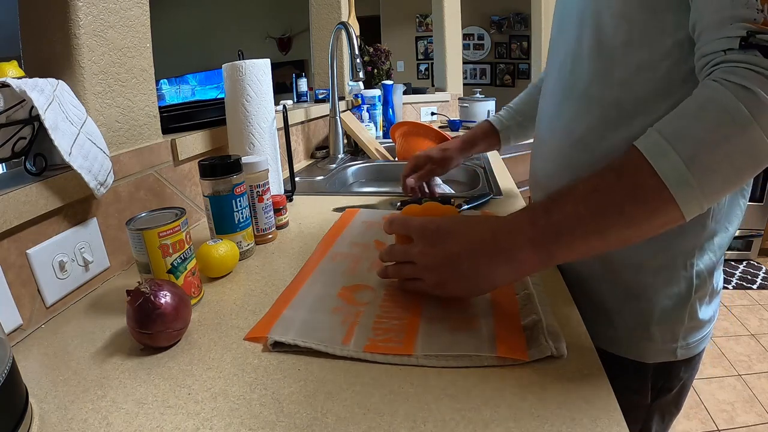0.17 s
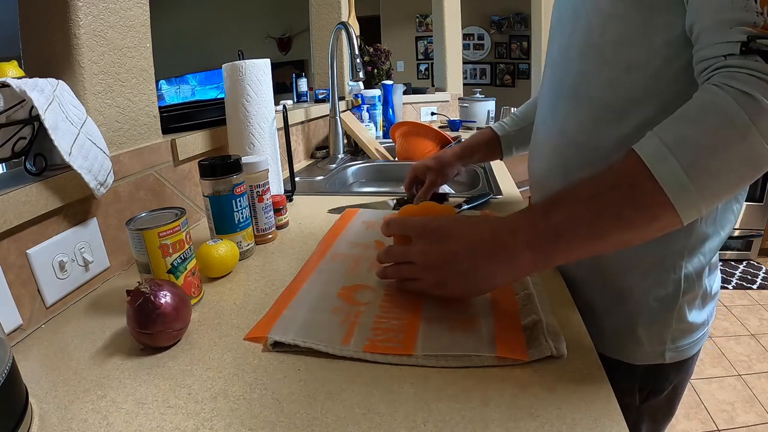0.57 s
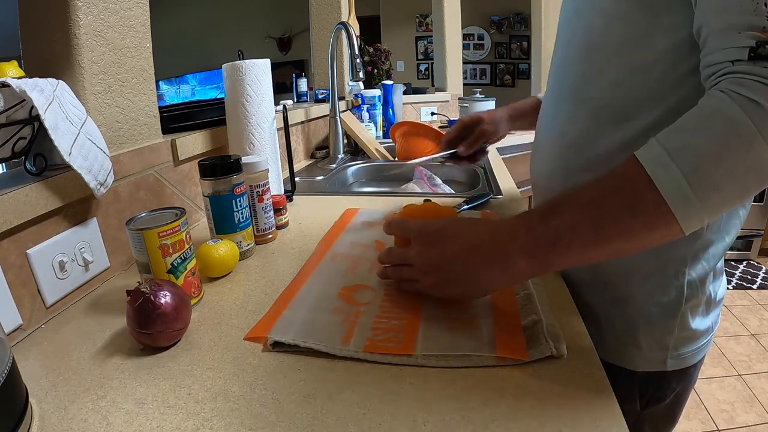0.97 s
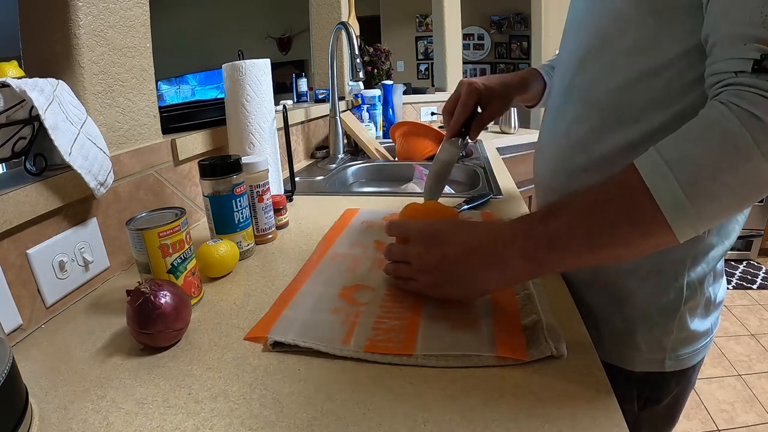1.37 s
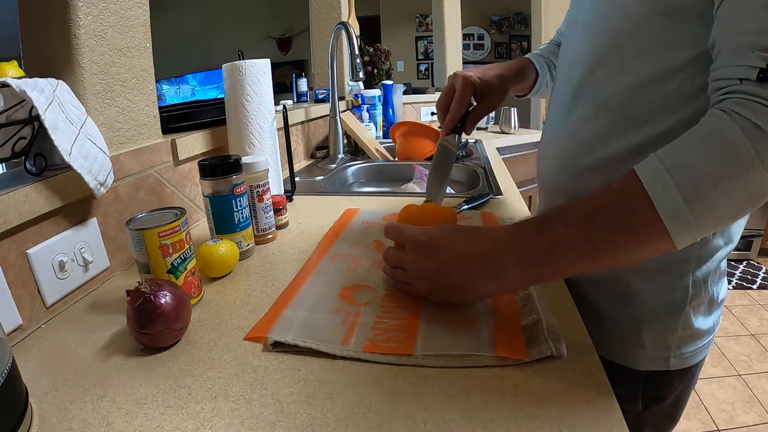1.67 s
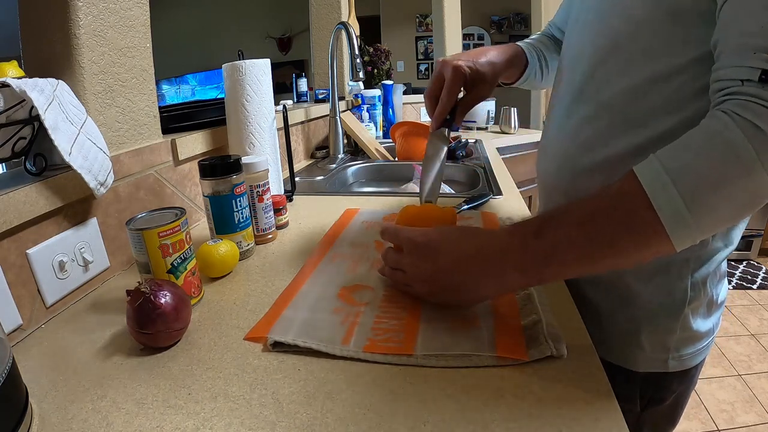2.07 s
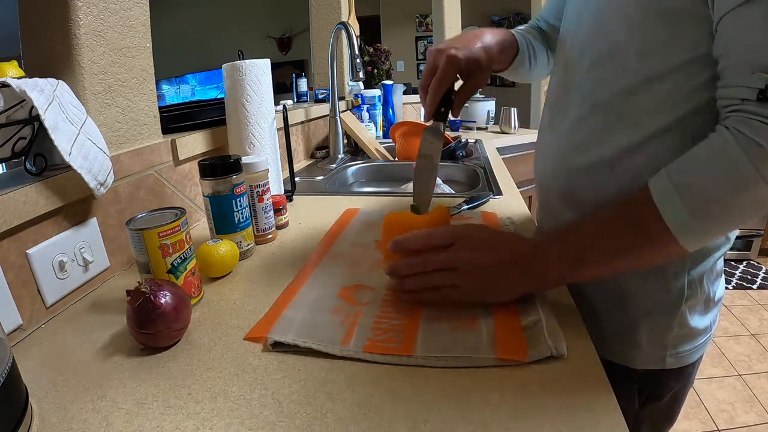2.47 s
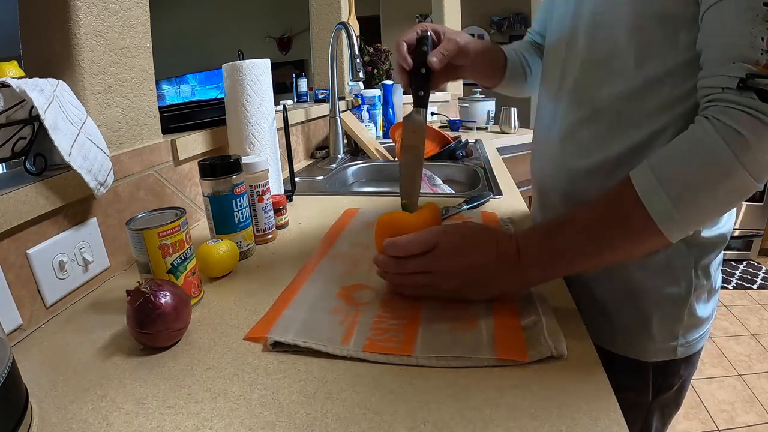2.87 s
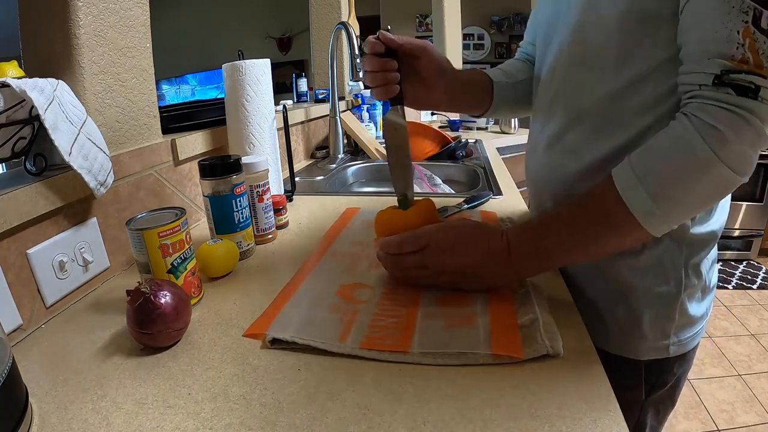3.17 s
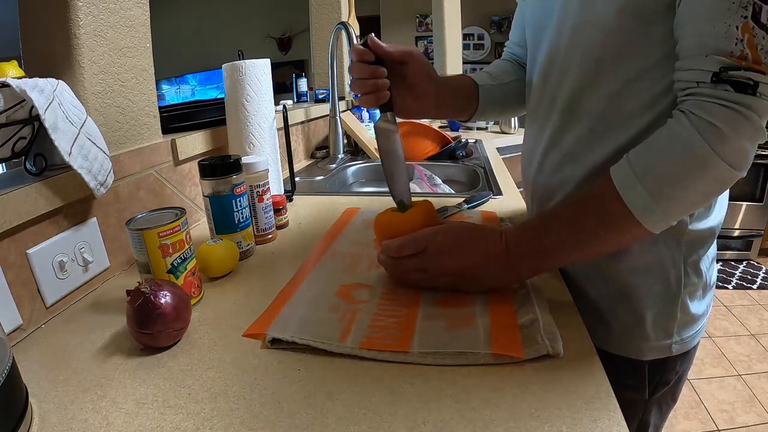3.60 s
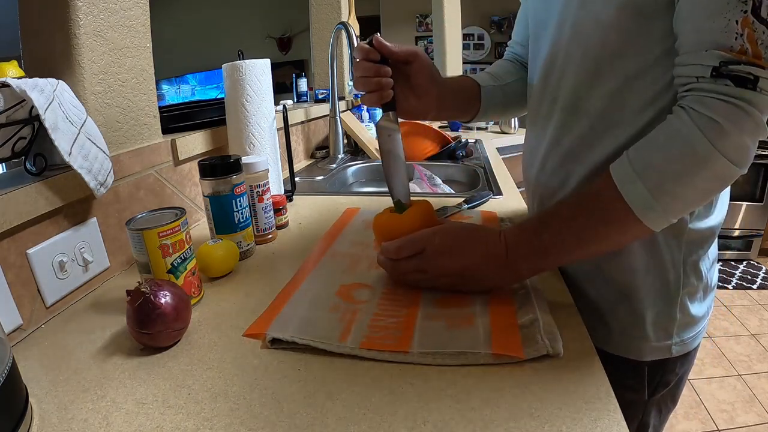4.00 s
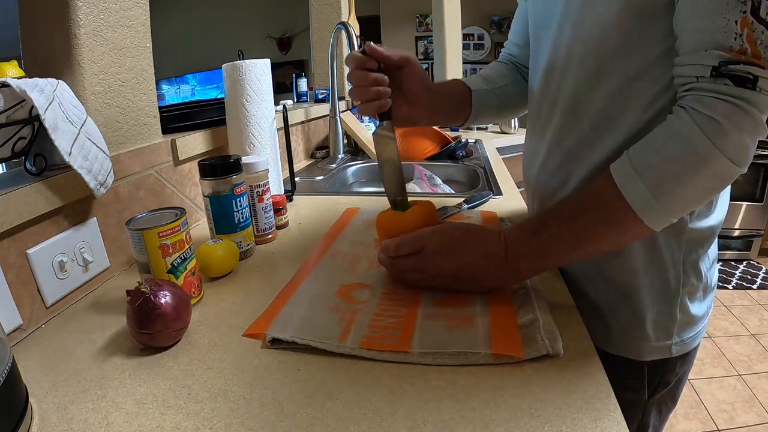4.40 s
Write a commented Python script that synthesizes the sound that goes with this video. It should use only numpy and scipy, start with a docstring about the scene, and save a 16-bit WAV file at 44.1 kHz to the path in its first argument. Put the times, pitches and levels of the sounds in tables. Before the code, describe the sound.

A low, steady motor hum and soft fan rush fill a small, hard-surfaced kitchen throughout, heard in stereo from close by on the counter. From 0 to about 0.45 s, steel utensils clatter against a sink rim: light clinks at first, then a loud tumble of hollow knocks, sharp clicks and short metallic ringing, strongest around 0.2 to 0.4 s, over a faint blade scrape. Sparser taps follow at 0.57 to 0.8 s, with short scrapes, a tiny groaning judder near 0.72 s and a final brighter knock and scrape at 0.8 s. Mostly hum remains until faint rubs around 1.7 to 2.3 s. From 2.3 to 3.2 s, a knife tip pushes into a crisp pepper in soft, juicy, grainy crunches, the skin giving way hollowly near 2.7 s. From 3.5 s come faint rubbing and small snaps, crisper at 4.2 to 4.5 s, with dull low counter bumps near 4.0 and 4.3 s.

```python
"""Appliances hum throughout in a small, hard kitchen: motor tones over filtered fan noise.
First a knife is picked out of steel utensils at a sink rim: decaying modes and noise bursts knock and clink.
Meanwhile the blade scrapes along the rim: grains excite its modes; it groans briefly before the loudest drags.
Then its tip is pushed and sawn through a crisp bell pepper: shaped grains crunch, rub and snap.
All is heard in stereo from close by on the counter."""
import sys
import numpy as np
from scipy import signal
from scipy.fft import rfft, irfft, next_fast_len
from scipy.io import wavfile
from scipy.ndimage import uniform_filter1d, map_coordinates

SR = 44100
rng = np.random.default_rng(int(sys.argv[2]) if len(sys.argv) > 2 else 0)


def bounce(signal):
    """Save signal as a 16-bit WAV file at the path given by the first command-line argument."""
    frames = np.transpose(np.atleast_2d(signal))
    limited = np.clip(frames, -1, 1)
    pcm = np.round(limited * 32767).astype(np.int16)
    wavfile.write(sys.argv[1], SR, pcm)


N = 200610

# Motor tones. Each row: frequency in Hz, mean level in dB rms.
MOTOR_TONES = [(36, -51), (59, -59.5), (109, -54.5), (119.9, -46), (144.9, -46.5), (289.8, -57.5),
               (349.5, -62.5), (579.8, -70.5), (1841, -76.5), (2068, -88.5)]
# Fan noise. Each row: frequency in Hz, relative density in dB per Hz.
FAN_SPECTRUM = [(20, -17), (45, -17.5), (80, -9.5), (130, 2), (170, -4), (250, -3.5), (370, -5), (450, -12),
                (650, -22), (1000, -19), (1850, -26), (2800, -36), (8500, -53.5), (12000, -76)]
FAN_DB, FAN_WANDER_DB = -47.5, 0.5
# Diffuse sound. Each row: frequency in Hz, left-right likeness from 0 to 1.
DIFFUSE_LIKENESS = [(100, 0.97), (700, 0.93), (1500, 0.75), (3000, 0.53), (6000, 0.21), (12000, 0.17)]
# Reverberation of the kitchen. Each row: frequency in Hz, t60 in seconds.
KITCHEN_T60 = [(150, 0.44), (700, 0.55), (3000, 0.5), (8000, 0.55), (14000, 0.23)]
# Port colour. Each row: frequency in Hz, left minus right in dB.
PORT_DIFFERENCE = [(500, 0), (1000, 0), (2000, 1.6), (4000, 0.9), (7000, -0.6), (9000, -1.2), (13000, -2.5)]
TOP_HZ = 15650

# Utensils meeting the rim and each other. Each row: start in seconds, relative knock level in dB,
# favoured knock pitch in Hz, relative click level in dB, favoured click pitch in Hz, relative ring level in dB.
UTENSIL_CONTACTS = [(0.013, -34.5, 1150, -46.5, 3300, -55), (0.108, -47, 300, -44, 2500, -67),
                    (.118, -33.5, 1200, -47, 3600, -42), (0.1386, -59, 705, -35, 8600, -58),
                    (0.157, -23, 450, -34.5, 2400, -72), (.166, -23, 400, -48, 2400, -72),
                    (.187, -31, 260, -49, 2000, -72), (.212, -17, 760, -42.5, 6500, -65),
                    (0.2276, -12, 697, -32.5, 2000, -64), (.2325, -14, 1220, -40.5, 2420, -58),
                    (.241, -14, 634, -59, 1800, -66), (0.248, -17.5, 458, -56, 1790, -70),
                    (.262, -25.5, 480, -57, 1800, -74), (0.305, -16, 544, -53, 2150, -70),
                    (.311, -10.5, 1140, -27, 3600, -49), (.321, -8.5, 627, -35, 4800, -44.5),
                    (0.3254, -16.5, 700, -26.5, 4800, -51), (.3305, -14.5, 715, -29.5, 6600, -33.5),
                    (.338, -23.5, 484, -49.5, 3700, -51), (.358, -19.5, 298, -31, 2300, -57),
                    (.382, -16, 221, -45, 2000, -46), (.392, -20, 960, -29, 3080, -61),
                    (0.396, -26, 1780, -44, 4900, -65), (.463, -34.5, 1120, -58.5, 2000, -65),
                    (0.5744, -26, 560, -44, 6500, -58), (.598, -41, 222, -58, 3530, -74),
                    (0.6638, -48.5, 300, -52.5, 5000, -65), (.716, -41, 600, -47, 3800, -72),
                    (.735, -41.5, 800, -57, 2200, -72), (.758, -52, 480, -46, 2000, -73),
                    (.789, -40, 1460, -49, 6200, -74), (.798, -29, 600, -53, 6000, -72),
                    (.8045, -25.5, 340, -42.5, 3200, -69)]
# Modes of sink and counter. Each row: frequency in Hz, relative level in dB, t60 in seconds.
SINK_MODES = [(189, -28.5, 0.16), (220, 0, 0.36), (263, -16, 0.15), (298.5, 4, 0.15), (390, -13, 0.24),
              (451.4, 0.5, 0.23), (472, -2.5, 0.11), (520, 2.5, 0.16), (553, -4.5, 0.13), (628.7, -2, 0.14),
              (680, -9, 0.16), (729, -4, 0.17), (735.7, -2.5, 0.19), (774, -10, 0.14), (901, -7.5, 0.19),
              (932, 0.5, 0.11), (1053, -11.5, 0.17), (1121.3, -2.5, 0.16), (1174, -12, 0.14),
              (1252, -4.5, 0.12), (1459, -5, 0.074), (1632, -3.5, 0.091), (1735, -4, 0.092),
              (1855, -14, .11), (1897, -9.5, 0.14)]
# Crowd of weaker sink modes. Each row: frequency in Hz, relative density in dB per Hz.
THUD_SPECTRUM = [(50, -10.5), (110, -1), (220, -27), (450, 5), (750, -6.5), (1150, -9), (1800, -12.5),
                 (2900, -48), (5000, -27), (9000, -79)]
# Steel pressed on steel, briefly damped. Each row: frequency in Hz, -6 dB width in Hz, relative level in dB.
CLICK_PEAKS = [(1350, 2060, 7), (2254, 650, 1.5), (3160, 590, -3.5), (4130, 180, -1), (4695, 450, -1),
               (6030, 360, -11), (6840, 440, -7.5), (8650, 310, -5.5), (9080, 430, -13), (10500, 550, -19),
               (12800, 1000, -24), (15140, 900, -25.5)]
# Modes of the utensils. Each row: frequency in Hz, relative level in dB, t60 in seconds when free.
CUTLERY_MODES = [(2030, -6, .35), (2180, -7, .3), (2620, -7, .28), (3270, -6, .08), (3400, -6, .08),
                 (3672, 3, .4), (4270, -4, .06), (4500, -5, .07), (4760, -4, .25), (4813, 2, .38),
                 (4960, -3, .16), (5690, -14, .15), (6002, -9, .3), (6266, -13, .1), (6934, -7, .16),
                 (7050, -8, .2), (8516, -1.5, .09), (8660, -6, .05), (9238, -17, .15), (10330, -17, .28),
                 (11000, -21, .22), (12900, -22, .16), (13400, -26, .16)]
# A contact lasts too long for the highest treble. Each row: frequency in Hz, gain in dB.
STEEL_GAIN = [(300, -6), (1200, 0.5), (9000, -2), (11000, -3.5), (15500, -10.5)]
# Sliding handles. Each row: frequency in Hz, relative density in dB per Hz.
SLIDE_SPECTRUM = [(60, -27), (130, -38), (185, 2.5), (225, -4), (300, 1.5), (380, -14), (480, -12.5),
                  (620, -7.5), (1000, -17), (2000, -35), (4000, -40), (9000, -99)]
KNOCK_FAVOUR_DB, KNOCK_OCTAVES = 8, 0.23  # lift and reach of the favoured pitches
CLICK_FAVOUR_DB, CLICK_OCTAVES = 11, 0.52
DENT_DB, DENT_T60_S = 5, 0.0089  # the struck spot itself gives briefly; dB relative to the knock
FREE_AT_S, PRESSED_T60_RATIO = 0.3, 0.35
SLIDE_DB, SLIDE_DB_PER_KNOCK_DB = -29, 0.35  # level for a knock of 0 dB
SLIDE_RISE_S, SLIDE_T60_S = 0.038, 0.17

# Blade drags over the rim. Each row: start in seconds, length in seconds, relative final level in dB,
# swell up to it in dB (negative falls), free ringing relative to that level in dB.
BLADE_DRAGS = [(0, 0.24, -52, 1.5, -14), (0.613, 0.036, -52.5, 0.5, 0), (0.708, 0.038, -55, -4, -10),
               (0.762, 0.027, -44.5, 4, -12), (0.782, 0.018, -36.5, 2, 4.5)]
DRAG_ATTACK_S, DRAG_T60_S = 0.002, 0.023
# Modes of the free blade. Each row: frequency in Hz, relative level in dB, t60 in seconds.
BLADE_MODES = [(793, 2, .07), (878, 5, 0.08), (1350, 4.5, 0.2), (1460, 8.5, 0.035), (1760, 1, 0.06),
               (1990, 0, 0.07), (2400, -9, .06), (3137, -6, 0.093), (3656, -12, 0.05), (4640, -17, .06),
               (5480, -17.5, 0.2), (5950, -12, 0.045), (6300, -20, .05), (6980, -15, 0.1),
               (8485, -11.5, 0.11), (10270, -25.5, 0.2), (12300, -29, .15), (13200, -34, .22),
               (14560, -37.5, .15), (15000, -33, .1)]
JUDDER_AT_S, JUDDER_HOLD_S, JUDDER_HZ, JUDDER_DB = 0.713, 0.043, 479.5, -43.5  # mean pitch, final level
# Harmonics of the judder from the first up: relative level in dB.
JUDDER_HARMONICS = [3, -11.5, -29, -9]

# Blade rubs in its slit. Each row: start in seconds, length in seconds, relative final level in dB, swell in dB.
SLIT_RUBS = [(1.66, .1, -81, 2), (2.06, 0.025, -69, -1), (2.21, 0.033, -76, -4), (2.302, 0.032, -64.5, 0),
             (2.83, 0.17, -77, 4), (3.225, 0.031, -70, 1), (3.48, .31, -79.5, -7),
             (4.222, 0.059, -51.5, 7.5), (4.29, 0.097, -70, 13), (4.447, 0.024, -59.5, 5),
             (4.48, 0.049, -67, -5)]
RUB_ATTACK_S, RUB_T60_S = 0.0063, 0.097
# Held blade, damped by the flesh. Each row: frequency in Hz, -6 dB width in Hz, relative level in dB.
HELD_BLADE_PEAKS = [(900, 460, -1), (1400, 700, -1.5), (2280, 750, -6.5), (3510, 690, 1), (4650, 580, 0.5),
                    (5270, 270, 3.5), (5880, 340, 4), (6700, 520, 0), (8360, 560, -1.5), (8870, 690, -1),
                    (10100, 610, -9.5), (12500, 1200, -17)]
# Surges of the edge into the flesh. Each row: start in seconds, length in seconds, relative final level in dB,
# swell in dB, favoured pitch in Hz.
CUT_SURGES = [(2.315, 0.023, -56, 4, 5030), (2.469, 0.081, -55.5, 1.5, 3300),
              (2.568, 0.091, -54.5, 6, 4560), (2.667, 0.074, -58.5, -2, 3000),
              (2.984, 0.095, -57, 10, 3300), (3.082, .08, -53, 3.5, 2700), (3.166, 0.021, -56.5, -2, 3500),
              (3.226, 0.032, -60.5, -1, 2720)]
CUT_ATTACK_S, CUT_T60_S = 0.015, 0.32
CUT_FAVOUR_DB, CUT_OCTAVES = 1.5, 0.23
CRISP_DB = 2.2  # depth of the patches in the bursting cells
# Bursting cells. Each row: frequency in Hz, relative density in dB per Hz.
FLESH_SPECTRUM = [(650, -47), (1200, 2), (1750, -1), (2800, -4), (4600, -6), (7000, -13), (9000, -13.5),
                  (11000, -21.5), (13000, -26), (15500, -34)]
# Fine juice spray under a hard push. Each row: frequency in Hz, relative density in dB per Hz.
FIZZ_SPECTRUM = [(3000, -26), (6000, -13), (9000, -0.5), (13000, -2), (15500, -4)]
FIZZ_DB = -64.5  # at the hardest push
# Hollow shell of the pepper. Each row: frequency in Hz, relative density in dB per Hz.
SHELL_SPECTRUM = [(500, -27), (750, -3.5), (930, 12.5), (1200, 8.5), (1500, 5), (1800, 8.5), (2100, -6),
                  (2450, 2.5), (2900, -3.5), (3500, -1), (6000, -30), (12000, -37)]
SKIN_AT_S, SKIN_DB = 2.673, -44
SKIN_ATTACK_S, SKIN_HOLD_S, SKIN_T60_S = 0.02, 0.025, 0.24
# Fibre snaps. Each row: start in seconds, relative peak in dB, favoured pitch in Hz.
FIBRE_SNAPS = [(3.494, -57, 3500), (3.709, -53, 3600), (3.741, -56, 2620), (3.783, -54, 3600),
               (3.9384, -61.5, 8600), (3.998, -49, 8900), (4.018, -58, 3700), (4.15, -57, 6300),
               (4.239, -41.5, 5600), (4.2721, -43, 3700), (4.466, -46.5, 6000)]
SNAP_FAVOUR_DB, SNAP_OCTAVES = 8, 0.3
# Pushes that rock the counter. Each row: start in seconds, length in seconds, final level in dB, swell in dB.
COUNTER_BUMPS = [(3.99, 0.05, -51, -4), (4.3, 0.07, -45.5, 3)]
BUMP_ATTACK_S, BUMP_T60_S = 0.025, 0.1
# Rocking counter. Each row: frequency in Hz, relative density in dB per Hz.
COUNTER_SPECTRUM = [(20, -20), (36, -13), (52, 15), (80, -6), (200, -8), (400, -22), (700, -32),
                    (1500, -55), (4000, -99)]


def amp(db):
    """Decibels to gain."""
    return 10 ** (np.asarray(db) / 20)


def unit(x):
    """Scaled to rms 1."""
    return x / np.sqrt(np.mean(x ** 2) + 1e-20)


def along(points, hz):
    """Interpolates (Hz, value) points on a log frequency axis."""
    f, v = np.transpose(points)
    return np.interp(np.log(hz + 1), np.log(f + 1), v)


def fade(t, t60_s):
    """Exponential decay by 60 dB in t60_s."""
    return np.exp(-np.log(1000) * t / t60_s)


def wobble(rate_hz):
    """A smooth random curve with rate_hz knots a second."""
    knots = rng.standard_normal(int(N * rate_hz / SR) + 4)
    return map_coordinates(knots, [np.arange(N) * rate_hz / SR])


def add(track, start_s, sound):
    """Adds a sound to a track in place."""
    part = track[max(round(start_s * SR), 0):][:len(sound)]
    part += sound[:len(part)]


def filtered(x, response):
    """x times a complex response of frequency."""
    n = x.shape[-1]
    m = next_fast_len(n + SR // 8)
    return irfft(rfft(x, m) * response(np.fft.rfftfreq(m, 1 / SR)), m)[..., :n]


def coloured(x, spectrum):
    """x shaped by (Hz, dB) points, at rms 1."""
    return unit(filtered(x, lambda hz: amp(along(spectrum, hz))))


def resonate(x, peaks):
    """x through steep-sided (Hz, width Hz, dB) resonances."""
    def response(f):
        return sum(amp(db) * (1j * f * w / (c * c - f * f + 1j * f * w)) ** 2 for c, w, db in peaks)
    return filtered(x, response)


def ring(modes, t, scatter_db):
    """Decaying modes, their strengths and signs redrawn per call, starting near rms 1."""
    hz, db, t60_s = np.transpose(modes)[:, :, None]
    gain = amp(db + scatter_db * rng.standard_normal(hz.shape)) * rng.choice([-1, 1], hz.shape)
    total = np.sum(gain * np.sin(2 * np.pi * hz * t) * fade(t, t60_s), axis=0)
    return total / np.sqrt(np.sum(amp(db) ** 2) / 2)


def grains(rate_hz, spread_db):
    """Random one-sample impulses of uneven size, at rms 1."""
    hits = rng.random(N) < rate_hz / SR
    return unit(hits * rng.choice([-1, 1], N) * amp(spread_db * rng.standard_normal(N)))


def burst(t, t60_s, colour):
    """A dying puff of noise through a colouring function, rising smoothly, at peak 1."""
    x = colour(rng.standard_normal(len(t)) * fade(t, t60_s))
    x = x * (1 - np.exp(-(t / 0.0003) ** 2))
    return x / np.abs(x).max()


def favour(hz, centre_hz, lift_db, octaves):
    """dB lift of the pitches near a centre."""
    return lift_db * np.exp(-(np.log2((hz + 1) / centre_hz) / octaves) ** 2 / 2)


def strokes(rows, attack_s, t60_s):
    """Gain per sample: each (start, length, dB, swell dB) row sets in, swells to its level and dies away."""
    power = np.zeros(N)
    for start_s, length_s, db, swell_db in rows:
        t = np.arange(N) / SR - start_s
        pressure = amp(db - swell_db * (1 - np.clip(t / length_s, 0, 1)) ** 2)
        decay = fade(np.maximum(t - length_s, 0), t60_s)
        power += (pressure * np.clip(t / attack_s, 0, 1) * decay) ** 2
    return np.sqrt(power)


def wander(x, share, rate_hz):
    """The pitch of x drifts as its reading position wobbles."""
    return map_coordinates(x, [np.arange(N) + share * SR / rate_hz * wobble(rate_hz)], order=5)


def patchy(x, depth_db):
    """x with short random patches of stronger and weaker pitches, at rms 1."""
    z = signal.stft(x, nperseg=256)[2]
    field = uniform_filter1d(rng.standard_normal(z.shape), size=6, axis=0)  # over frequency
    field = uniform_filter1d(field, size=4, axis=1)  # over time
    return unit(signal.istft(z * amp(depth_db * unit(field)))[1][:N])


def diffuse(pair):
    """Mixes two unrelated signals to the left-right likeness of sound from all sides."""
    def mid_side(hz):
        angle = np.arccos(np.clip(along(DIFFUSE_LIKENESS, hz), -1, 1)) / 2
        return np.array([np.cos(angle), np.sin(angle)])
    mid, side = filtered(pair, mid_side)
    return np.array([mid + side, mid - side])


def placed(x, lead_us, wet_db):
    """A source reaches the right port first by lead_us; then the kitchen answers with a diffuse tail."""
    half_turns = lead_us / 10 ** 6 * np.array([[-1], [1]])
    direct = filtered(x, lambda hz: np.exp(1j * np.pi * hz * half_turns))
    hz, t, z = signal.stft(rng.standard_normal((2, SR // 2)), SR, nperseg=256)
    envelope = fade(t, along(KITCHEN_T60, hz)[:, None]) * (1 - np.exp(-t / 0.00083))
    tail = signal.istft(z * envelope, SR)[1]
    tail = diffuse(tail / np.linalg.norm(tail[0]))
    return direct + amp(wet_db) * signal.fftconvolve(x[None], tail, axes=1)[:, :N]


def appliances():
    """Motor tones, wavering slightly in level and phase, over the rush of fans."""
    t = np.arange(N) / SR
    hum = np.zeros(N)
    for hz, db in MOTOR_TONES:
        level = amp(db + 0.39 * wobble(1.9)) * np.sqrt(2)
        hum += level * np.sin(2 * np.pi * (hz * t + rng.random()) + 0.035 * wobble(2.1))
    air = coloured(diffuse(rng.standard_normal((2, N))), FAN_SPECTRUM)
    return hum + amp(FAN_DB + FAN_WANDER_DB * wobble(3.0)) * air


def handle_slides():
    """Grainy friction of the handles: it sets in just before each knock and dies after it."""
    rows = [(start_s - SLIDE_RISE_S, SLIDE_RISE_S, SLIDE_DB + SLIDE_DB_PER_KNOCK_DB * knock_db, 0)
            for start_s, knock_db, *_ in UTENSIL_CONTACTS]
    return strokes(rows, SLIDE_RISE_S, SLIDE_T60_S) * coloured(grains(rate_hz=580, spread_db=0.5), SLIDE_SPECTRUM)


def clatter():
    """Each contact dents and drums on the sink, clicks, and leaves the utensils ringing; the handles slide."""
    body, steel, t = np.zeros(N), np.zeros(N), np.arange(SR // 2) / SR
    swell = 1 - np.exp(-t / 0.001)  # the heavy sink takes a moment to move
    for start_s, knock_db, knock_hz, click_db, click_hz, ring_db in UTENSIL_CONTACTS:
        low = lambda hz: favour(hz, knock_hz, KNOCK_FAVOUR_DB, KNOCK_OCTAVES)
        high = lambda hz: favour(hz, click_hz, CLICK_FAVOUR_DB, CLICK_OCTAVES)

        dent = swell * np.sin(2 * np.pi * knock_hz * t) * fade(t, DENT_T60_S)
        sink_modes = [(hz, db + low(hz), t60_s) for hz, db, t60_s in SINK_MODES]
        drum = swell ** 2 * ring(sink_modes, t, scatter_db=2.0)
        thud_spectrum = [(hz, db + low(hz)) for hz, db in THUD_SPECTRUM]
        thud = burst(t, t60_s=0.026, colour=lambda x: coloured(x, thud_spectrum))
        add(body, start_s, amp(knock_db) * (amp(DENT_DB) * dent + amp(-12.5) * drum + amp(-4.5) * thud))

        click_peaks = [(hz, width_hz, db + high(hz)) for hz, width_hz, db in CLICK_PEAKS]
        click = burst(t, t60_s=0.031, colour=lambda x: resonate(x, click_peaks))
        add(steel, start_s, amp(click_db + 3.0) * click)

        sustain = PRESSED_T60_RATIO if start_s < FREE_AT_S else 1  # at first the hand damps the utensils
        modes = [(hz, db + high(hz), sustain * t60_s) for hz, db, t60_s in CUTLERY_MODES]
        add(steel, start_s, amp(ring_db - 12.0) * ring(modes, t, scatter_db=3))
    body += handle_slides()
    steel = filtered(steel, lambda hz: amp(along(STEEL_GAIN, hz)))
    return placed(body, lead_us=47, wet_db=-14.0) + placed(steel, lead_us=17, wet_db=-9)


def scrape():
    """Tiny slips along the edge ring the blade, both pressed on the rim and free."""
    catches = grains(rate_hz=1700, spread_db=0.5)
    pressed_rows = [row[:4] for row in BLADE_DRAGS]
    free_rows = [(start_s, length_s, db + sing_db, swell_db)
                 for start_s, length_s, db, swell_db, sing_db in BLADE_DRAGS]
    slips = catches * strokes(pressed_rows, DRAG_ATTACK_S, DRAG_T60_S)
    free_slips = catches * strokes(free_rows, DRAG_ATTACK_S, DRAG_T60_S)
    blade = ring(BLADE_MODES, np.arange(SR // 2) / SR, scatter_db=1)
    singing = signal.fftconvolve(free_slips, blade / np.linalg.norm(blade))[:N]
    # on the rim the same modes are broad and shift with the point of contact
    broad_peaks = [(hz, 90 + 0.013 * hz, db) for hz, db, _ in BLADE_MODES]
    pressed = resonate(signal.unit_impulse(SR // 8), broad_peaks)
    rasp = signal.fftconvolve(slips, pressed / np.linalg.norm(pressed))[:N]
    rasp = wander(rasp, share=0.004, rate_hz=50)
    return placed(amp(-10) * singing + amp(-3.0) * rasp + judder(), lead_us=18, wet_db=-9)


def judder():
    """The edge sticks and slips on the rim nearly regularly: a short groan of wavering harmonics."""
    turns = np.cumsum(JUDDER_HZ * (1 + 0.035 * wobble(120))) / SR
    tone = unit(sum(amp(db) * np.sin(2 * np.pi * k * turns) for k, db in enumerate(JUDDER_HARMONICS, 1)))
    return tone * strokes([(JUDDER_AT_S, JUDDER_HOLD_S, JUDDER_DB, -3)], attack_s=0.0028, t60_s=0.089)


def slit_rub():
    """Slips excite the damped blade while it rubs the flesh of its slit."""
    blade = unit(resonate(grains(rate_hz=1400, spread_db=3), HELD_BLADE_PEAKS))
    flesh = coloured(grains(rate_hz=3400, spread_db=2), FLESH_SPECTRUM)
    return strokes(SLIT_RUBS, RUB_ATTACK_S, RUB_T60_S) * (blade + amp(-1) * flesh)


def bursting_cells():
    """Cells pop in patchy grains under the edge, each surge with its own favoured pitch."""
    cells = np.zeros(N)
    for *surge, centre_hz in CUT_SURGES:
        pops = patchy(grains(rate_hz=7000, spread_db=3), CRISP_DB)
        tone = lambda hz: amp(along(FLESH_SPECTRUM, hz) + favour(hz, centre_hz, CUT_FAVOUR_DB, CUT_OCTAVES))
        cells += strokes([surge], CUT_ATTACK_S, CUT_T60_S) * unit(filtered(pops, tone))
    return cells


def juice_fizz():
    """Fine spray that grows with the square of the cutting pressure."""
    pressure = strokes([row[:4] for row in CUT_SURGES], CUT_ATTACK_S, CUT_T60_S)
    spray = coloured(grains(rate_hz=5000, spread_db=3), FIZZ_SPECTRUM)
    return amp(FIZZ_DB) * (pressure / pressure.max()) ** 2 * spray


def skin_crunch():
    """The skin gives way once over the hollow shell."""
    gain = strokes([(SKIN_AT_S, SKIN_HOLD_S, SKIN_DB, 0)], SKIN_ATTACK_S, SKIN_T60_S)
    return gain * coloured(grains(rate_hz=2000, spread_db=2.5), SHELL_SPECTRUM)


def fibre_snaps():
    """Snapping fibres strike the held blade with short bursts."""
    snaps, t = np.zeros(N), np.arange(SR // 20) / SR
    for start_s, db, centre_hz in FIBRE_SNAPS:
        peaks = [(hz, width_hz, level_db + favour(hz, centre_hz, SNAP_FAVOUR_DB, SNAP_OCTAVES))
                 for hz, width_hz, level_db in HELD_BLADE_PEAKS]
        add(snaps, start_s, amp(db - 1.5) * burst(t, t60_s=0.015, colour=lambda x: resonate(x, peaks)))
    return snaps


def counter_push():
    """The push rocks the counter: low noise, equal in both ports."""
    noise = coloured(rng.standard_normal(N), COUNTER_SPECTRUM)
    return strokes(COUNTER_BUMPS, BUMP_ATTACK_S, BUMP_T60_S) * noise


def pepper():
    """The blade rubs, cells burst, the skin cracks and fibres snap, all at one spot; the counter rocks."""
    cut = amp(-2.0) * slit_rub() + amp(-1.0) * bursting_cells() + juice_fizz() + skin_crunch() + fibre_snaps()
    return placed(cut, lead_us=31.8, wet_db=-8.0) + counter_push()


def scene():
    """Everything in the kitchen."""
    return appliances() + clatter() + scrape() + pepper()


def record(dry):
    """Each port has its own colour; nothing passes above the band limit."""
    halves = np.array([[0.5], [-0.5]])
    return filtered(dry, lambda hz: amp(along(PORT_DIFFERENCE, hz) * halves) * (hz < TOP_HZ))


dry = scene()
out = record(dry)
bounce(out)
```